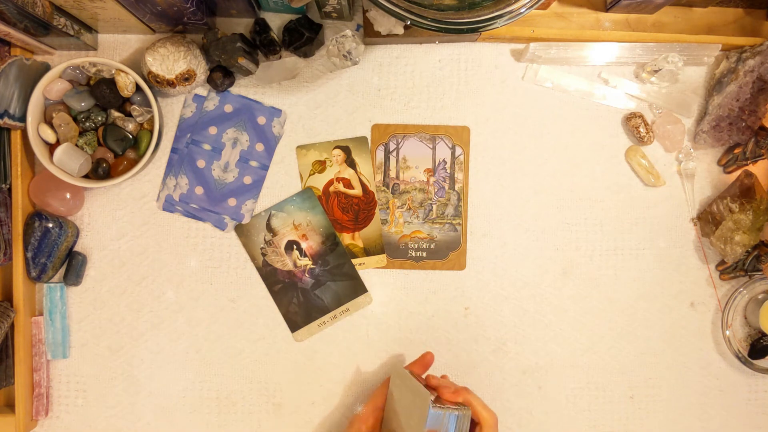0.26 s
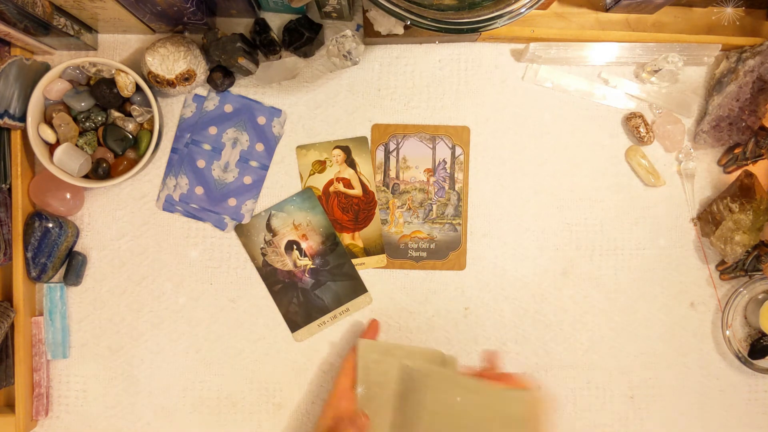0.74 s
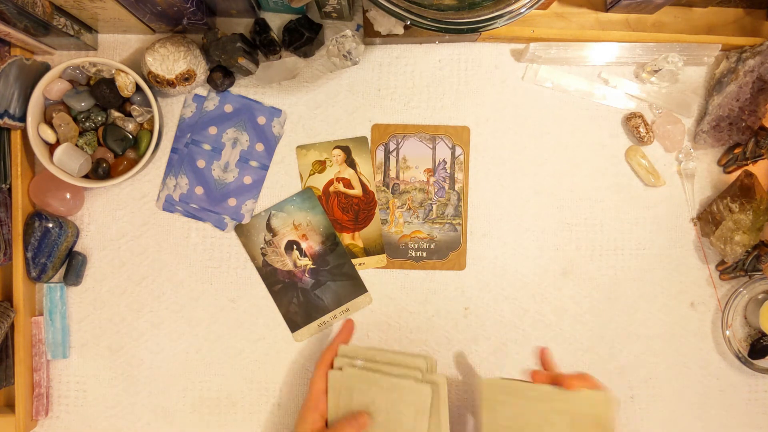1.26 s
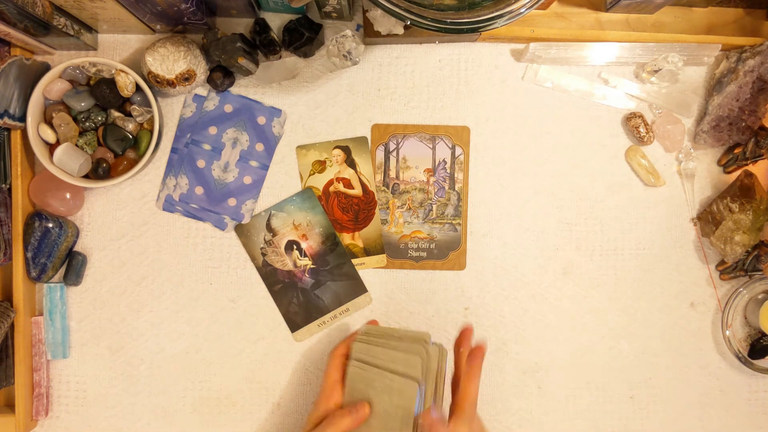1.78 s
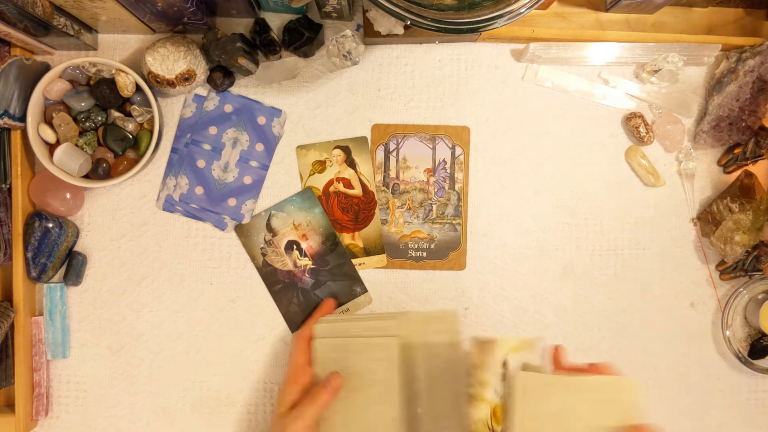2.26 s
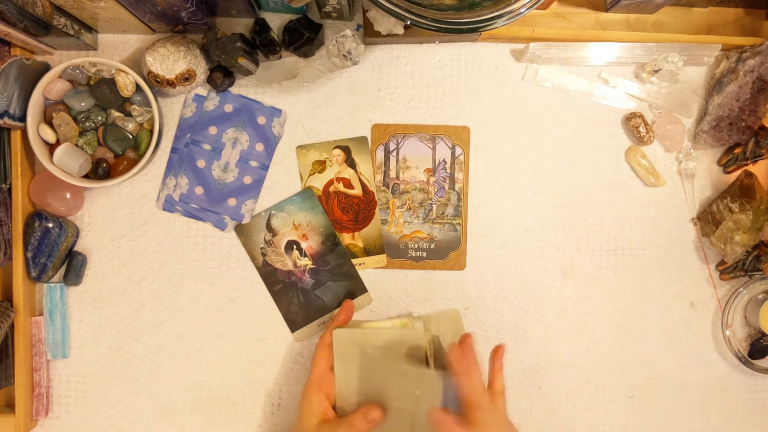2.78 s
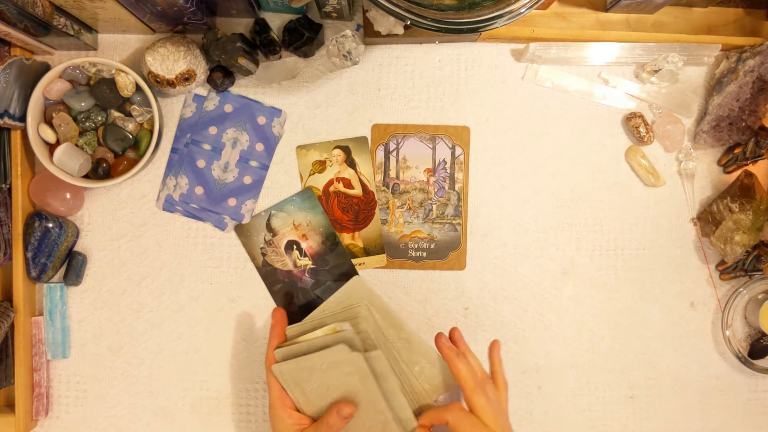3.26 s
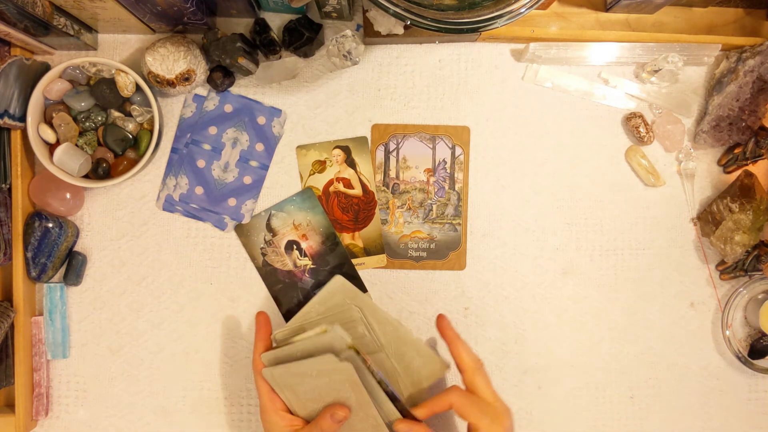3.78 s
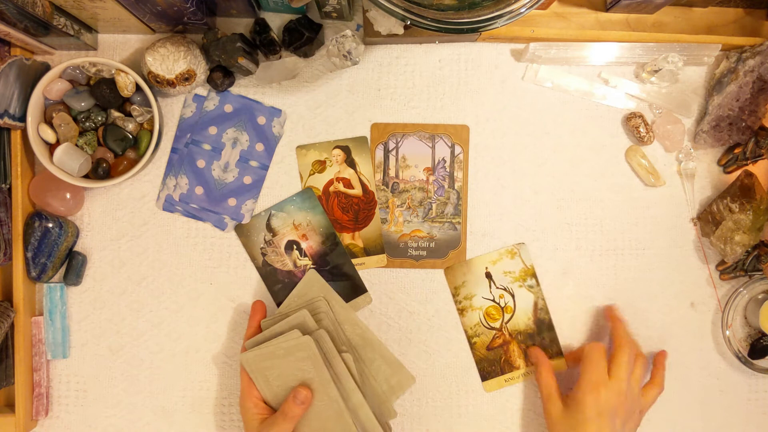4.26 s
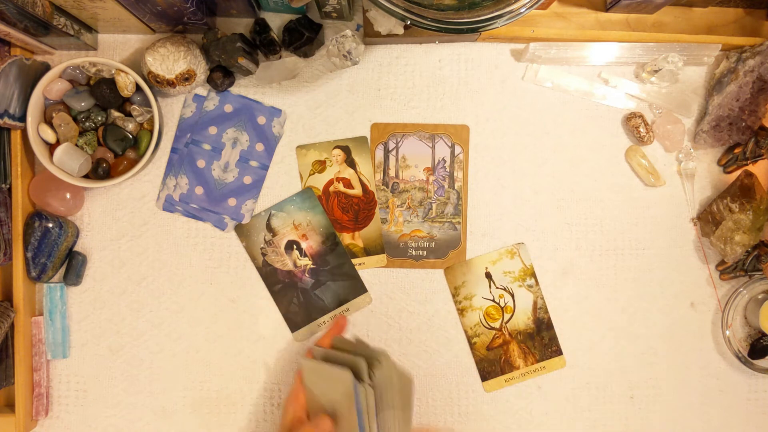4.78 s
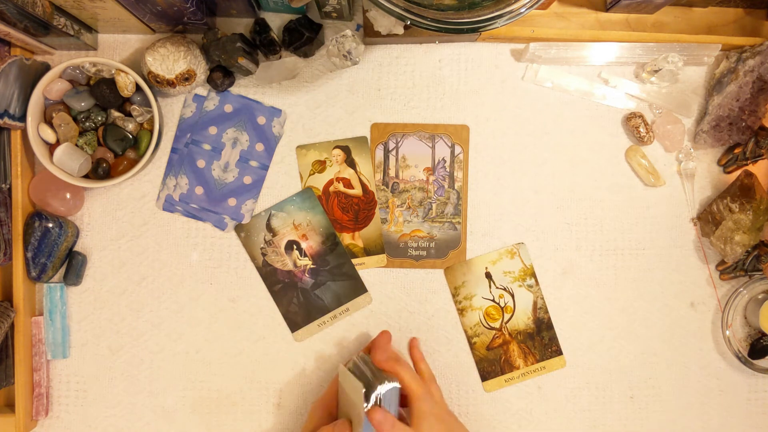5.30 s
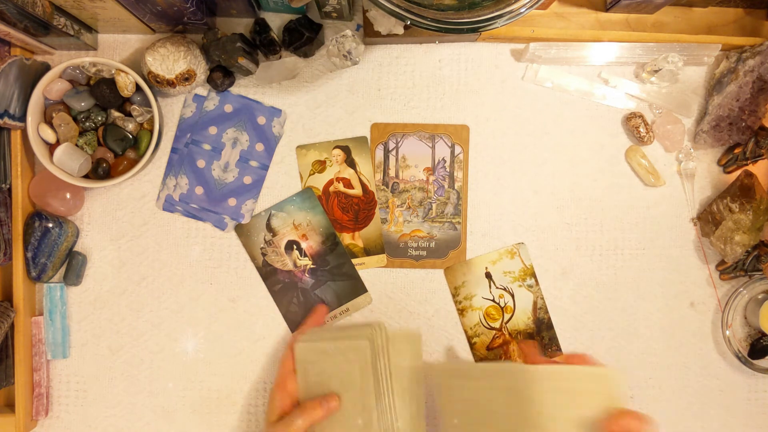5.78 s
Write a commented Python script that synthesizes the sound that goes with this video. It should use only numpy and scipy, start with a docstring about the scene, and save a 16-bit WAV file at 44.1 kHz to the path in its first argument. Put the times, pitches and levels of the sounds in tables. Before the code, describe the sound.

Stiff cards are shuffled overhand close to the microphone, with papery swishes, sharp edge snaps and hollow little pops over a low steady room rumble.

```python
"""A deck of stiff cards is shuffled overhand above a table in a quiet room, close to a microphone.
It starts almost quietly; from about 0.8 s packets slide past each other with a papery hiss (gritty noise),
their edges snap (short noise bursts) and trapped air pops (brief wavering tones), hardest near 2.6 and 3.0 s.
Faint shifts of the deck follow, more slides and pops from 4.1 to 4.5 s, and one last stroke near 6.0 s.
Between the louder strokes come faint rustles of the deck. A steady room rumble lies under it all."""
import sys
import numpy as np
from scipy import signal
from scipy.fft import rfft, irfft, next_fast_len
from scipy.io import wavfile
from scipy.ndimage import uniform_filter1d

SR = 44100
rng = np.random.default_rng(int(sys.argv[2]) if len(sys.argv) > 2 else 0)


def boost(x):
    """Linear amplitude factor 10**(x/20) for a level x in decibels (scalar or array-like)."""
    u = np.asarray(x, float) / 20
    return 10 ** u


def persist_wave(psi):
    """Save psi, clipped to +-1, as 16-bit WAV."""
    counts = np.round(np.clip(psi, -1, 1) * 32767).astype(np.int16)
    wavfile.write(sys.argv[1], SR, np.atleast_2d(counts).T)


N = 266302  # length in samples, about 6 s

# Spectrum of the room rumble and microphone hiss: (frequency [Hz], relative level [dB per Hz])
AIR_SPECTRUM = [(15, -16.5), (40, -11.5), (70, -12), (200, -9), (400, -10), (1300, -14), (1720, -18),
                (2100, -24), (3500, -31), (5500, -32), (8000, -34.5), (10000, -37), (13500, -35),
                (16500, -39)]
# Standing waves of the room lifting the rumble: (frequency [Hz], width [Hz], lift [dB])
STANDING_WAVES = [(76, 57, 12.5), (124, 34, 10), (167.6, 27, 14), (234, 53, 7.5), (302.5, 59, 8),
                  (385, 31, 7.5), (522.3, 30, -1.5), (570, 31, 5), (650, 19, 6), (804, 4.6, 10.5),
                  (834, 50, 4), (1010, 19, 4.5), (1067, 18, 5.5), (1580, 9.8, 4)]
# How fast the room's echoes die: (frequency [Hz], time to fall 60 dB [s])
WALL_DECAY = [(250, .12), (1000, .13), (4000, .16), (12000, .14)]
# Fingers faintly shifting the deck: (peak time [s], hiss level [dB], time to fall 20 dB [ms])
FINGER_SHIFTS = [(.007, -63.5, 17), (.212, -79, 47), (.325, -74.5, 118), (2.927, -71.5, 31.5),
                 (3.339, -70.5, 60), (3.52, -81, 48), (3.69, -72, 45), (3.897, -65.5, 84), (4.797, -81, 70),
                 (5.135, -64, 78), (5.21, -65, 67), (5.355, -72.5, 59.5), (5.416, -72.5, 11.5),
                 (5.507, -71, 40), (5.547, -69, 79), (5.66, -79, 119), (5.78, -75, 51.5),
                 (5.882, -64, 85.5)]
# Card faces rubbing, one row a stroke: (peak time [s], hiss level [dB], time to rise 20 dB [ms],
# time to fall 20 dB [ms], flexing of the card against the hiss [dB])
CARD_SLIDES = [(0.047, -65.5, 11, 10, -7), (.65, -65.5, 26, 100, -9), (.70, -63, 56, 109, -20),
               (.765, -60, 38, 32, -24), (0.784, -38, 8.5, 21, -26), (.805, -61, 15, 32, -7),
               (1.037, -40.5, 6.5, 95, -3.5), (1.079, -47.5, 31, 12, 2.5), (1.139, -34.5, 31, 39, -20),
               (1.375, -43.5, 9, 40, 6.5), (1.411, -43, 13, 23, -3.5), (1.457, -34, 32, 45, -13),
               (1.543, -46.5, 47, 4, -25), (1.567, -47, 2, 40, -11), (1.579, -37, 7, 15, -6),
               (1.599, -42, 2, 75, -6), (1.8, -52, 20.5, 27, -35), (1.887, -54.5, 62, 120, -45),
               (2.122, -54, 23, 4, -21), (2.299, -54.5, 61, 86, -40), (2.34, -54, 25, 127, -53),
               (2.448, -35, 23.5, 13, -39), (2.543, -53.5, 14, 5, -4), (2.572, -56, 9, 22, -6),
               (2.605, -57.5, -3.5, 41, 5.5), (2.635, -30, 0, 12, 4.5), (2.652, -39, 0, 46, 5),
               (2.738, -41.5, 68, 38, -8), (3.002, -67.5, 5, 63, 8.5), (3.027, -32.5, 1, 56.5, 3),
               (3.593, -63.5, 16.5, 88.5, -19), (4.04, -60.5, 8.5, 15.5, -28), (4.118, -59, 75, 38, -16),
               (4.16, -53.5, 82, 60, -15.5), (4.189, -46, 42, 72, -10), (4.239, -43.5, 46, 33, -6),
               (4.43, -70, 37, 26, -4.5), (4.468, -75, 17, 55, 10.5), (4.527, -56, 18.5, 38.5, 12.5),
               (4.883, -56.5, 10, 89, -24), (4.916, -51.5, 39.5, 69, -28.5), (5.095, -56.5, 46, 31.5, -33),
               (5.261, -63.5, 16.5, 81, -33), (5.937, -55, 33.5, 114.5, -42.5),
               (5.995, -55.5, 34.5, 15.5, -30), (6.024, -36, 26.5, 14, -24)]
# Level of the top treble against the hiss, as time goes by: (time [s], level [dB])
SHEEN_LEVEL = [(0, -27), (.3, -17), (.67, 3.5), (.79, -11), (1.05, -3), (1.6, -5), (1.8, -4), (1.88, -6.5),
               (2.12, -17), (2.3, -3.5), (2.45, -7), (2.6, -21), (2.74, -4.5), (3.03, -8), (3.6, -17),
               (4.1, -15.5), (4.2, -7), (4.9, -3.5), (5.1, -8), (5.26, -4.5), (5.5, -3), (6.0, -7.5)]
# Colour of card faces rubbing: (frequency [Hz], relative level [dB per Hz])
RUB_SPECTRUM = [(1710, -35), (2900, -13), (4030, -6.5), (4580, -5.5), (5140, -5), (5720, -9.5), (6600, -5),
                (8290, 3.5), (8840, -1.5), (9560, -9.5), (13700, -4.5), (15500, -20), (16000, -33)]
# Colour of a flexing card: (frequency [Hz], relative level [dB per Hz])
FLEX_SPECTRUM = [(280, -24), (480, -6.5), (964, -3.5), (1230, -8.5), (1520, 5), (1970, -4), (2440, 1.5),
                 (2670, -8), (2870, -5.5), (3000, -8), (3900, -28), (6600, -120)]
# Card edges striking: (time [s], level [dB], brightness [dB per octave])
EDGE_SNAPS = [(0.0492, -55, -5), (0.057, -56, -1), (0.2106, -61.5, -7), (1.0303, -38, -7.5),
              (1.035, -24.5, -3), (1.0407, -26, -0.5), (1.0764, -24.5, -3), (1.3751, -26.5, -4),
              (1.377, -23, -2), (1.412, -40, 3.7), (1.579, -24.5, 3), (1.5875, -29.5, 4.5),
              (1.6109, -27.5, 2.9), (1.6246, -27, 6), (2.1205, -35.5, -11), (2.3617, -50.5, 5),
              (2.461, -38, 2.5), (2.5338, -44.5, -2.3), (2.541, -33.5, -2.4), (2.551, -51, 0.5),
              (2.572, -39, 15), (2.6032, -41, 3.4), (2.6347, -16.5, -3), (2.6372, -22, -2.7),
              (2.6525, -17.5, 0), (2.6552, -25, -3.5), (2.6753, -27, 2), (2.925, -59, -2),
              (3.0258, -12, -5), (3.0303, -23.5, -0.7), (3.038, -26.5, 0), (3.0467, -27.5, -1.3),
              (3.0819, -35, 0.5), (3.5914, -52, 2.5), (4.2459, -32, -5), (4.5324, -36, -4.5),
              (4.7966, -58, -4.5), (5.4141, -63.5, 2), (5.7938, -60.5, 9), (6.0294, -35.5, -2.5)]
# Air squeezed from between cards or under a card:
# (peak time [s], level [dB], pitch [Hz], time to fall 60 dB [s])
AIR_POPS = [(.0476, -40, 6300, .0035), (.0481, -44.5, 570, .011), (1.0354, -28.5, 900, .0035),
            (1.0407, -23.5, 1540, .008), (1.072, -39.5, 1500, .0065), (1.3728, -29, 900, .0088),
            (1.3769, -19, 2290, .0087), (1.39, -40, 1500, .016), (1.4112, -42, 1000, .022),
            (1.5807, -29, 680, .011), (1.5995, -41.5, 650, .016), (1.6247, -40.5, 650, .046),
            (2.119, -42.5, 2000, .011), (2.1209, -40, 550, .013), (2.542, -50.5, 1800, .047),
            (2.549, -42.5, 445, .044), (2.572, -48.5, 1830, .05), (2.575, -53, 1196, .18),
            (2.613, -44, 1600, .013), (2.6343, -19.5, 650, .016), (2.6351, -15, 1450, .017),
            (2.636, -28, 250, .054), (2.6454, -23.5, 1450, .015), (2.6555, -22.5, 1400, .0099),
            (2.6555, -24, 620, .034), (2.665, -29, 1480, .07), (2.7, -45, 1480, .058),
            (2.734, -41.5, 1516, .033), (2.7497, -38.5, 480, .021), (3.0259, -10.5, 673.5, .0038),
            (3.0278, -9, 1116, .0023), (3.0316, -13.5, 985, .0049), (3.036, -26.5, 1500, .0098),
            (3.082, -10.5, 560, .0051), (3.094, -31.5, 592, .03), (4.2472, -38.5, 776, .045),
            (4.255, -46.5, 450, .086), (4.411, -36, 510, .026), (4.4129, -23.5, 810, .014),
            (4.427, -38.5, 830, .07), (4.432, -37.5, 1100, .039), (4.462, -49, 600, .04),
            (4.5304, -25.5, 630, .0094), (4.5315, -24.5, 1892, .0093), (6.01, -48, 170, .043)]
# Ringing of the deck and table top: (frequency [Hz], relative level [dB], time to fall 60 dB [s])
DECK_MODES = [(173, -12.5, 0.19), (250, -9, 0.035), (354, -4.5, 0.13), (435, -2.5, 0.037)]


def evened(x):
    """Scales a sound to an rms (average strength) of 1."""
    return x / np.sqrt(np.mean(x ** 2) + 1e-20)


def read(points, hz):
    """Joins table points on a log-frequency axis."""
    f, value = np.transpose(points)
    return np.interp(np.log(hz + 1), np.log(f + 1), value)


def add(mix, s, sound):
    """Mixes a sound in from time s, in seconds."""
    part = mix[max(round(s * SR), 0):][:len(sound)]
    part += sound[:len(part)]


def colour(x, gain):
    """Shapes a spectrum by gain(frequency in Hz)."""
    size = next_fast_len(len(x))
    hz = np.fft.rfftfreq(size, 1 / SR)
    return irfft(rfft(x, size) * gain(hz), size)[:len(x)]


def patchy(x, patchy_db, frames, bins):
    """Gives a sound level patches that drift over time and frequency."""
    z = signal.stft(x, nperseg=256, noverlap=192)[2]
    field = rng.standard_normal(z.shape[::-1]).T
    field = uniform_filter1d(field, bins, 0)  # wider bins: patches span more frequencies
    field = evened(uniform_filter1d(field, frames, 1))  # more frames: slower drift
    return signal.istft(z * boost(patchy_db * field), nperseg=256, noverlap=192)[1][:N]


def air():
    """The steady rumble of the room and the microphone's own hiss, as coloured noise."""
    level_db = -64.5
    still = patchy(rng.standard_normal(N), patchy_db=1.65, frames=40, bins=3)

    def gain(hz):
        lift_db = sum(db * np.exp(-(2 * (hz - f) / width) ** 2) for f, width, db in STANDING_WAVES)
        return boost(read(AIR_SPECTRUM, hz) + lift_db)

    return boost(level_db) * evened(colour(still, gain))


def room(x):
    """Sparse echoes of random sign, each frequency band dying at its own speed."""
    taps = np.zeros(SR // 2)
    at = np.arange(150, SR // 2 - 20, 20)  # one echo in every 20 samples
    taps[at + rng.integers(0, 20, len(at))] = rng.choice([-1., 1.], len(at))
    hz, t, z = signal.stft(taps, SR, nperseg=128)
    fade = boost(-60 * t / read(WALL_DECAY, hz)[:, None])
    tail = signal.istft(z * fade, SR, nperseg=128)[1]
    return signal.fftconvolve(x, tail / np.linalg.norm(tail))[:N]


def pops():
    """A pocket of air rings a few wavering cycles and thumps the deck and table."""
    rise_10ms_s, rise_power = .0011, .55  # rise of a pop that rings 10 ms; longer rings swell more slowly
    deck_db = -24.5
    thud_hz, thud_db, thud_t60_s = 70, -42.5, .15
    out, blows = np.zeros(N), np.zeros(N)
    waver = signal.fftconvolve(rng.standard_normal(N + SR), signal.windows.blackman(200), "same")
    waver = evened(waver)
    for s, db, hz, t60 in AIR_POPS:
        rise = rise_10ms_s * (t60 / .01) ** rise_power
        t = np.arange(-4 * rise, 1.4 * t60, 1 / SR)
        shape = boost(-60 * np.maximum(t, 0) / t60) * np.exp(-(np.minimum(t, 0) / rise) ** 2)
        for _ in range(2):  # no hard corner
            shape = uniform_filter1d(shape, size=round(rise * SR))
        # The pocket loses its shape, so the phase wanders away from the peak
        drift = 0.99 * waver[round(s * SR):][:len(t)] * np.minimum(abs(t) / 0.005, 1)
        add(out, s + t[0], boost(db) * shape * np.cos(2 * np.pi * hz * t + drift))
        push = signal.windows.hann(40) / 20 * 500 / hz  # a slow pop pushes harder
        add(blows, s, boost(db) * push)
    t = np.arange(SR // 8) / SR
    body = sum(boost(db - 60 * t / t60) * np.sin(2 * np.pi * hz * t) for hz, db, t60 in DECK_MODES)
    out += boost(deck_db) * signal.oaconvolve(blows, body)[:N]
    # Small things radiate no deep bass
    out = signal.sosfilt(signal.butter(3, 170, "high", fs=SR, output="sos"), out)
    # The table rocks on its legs after a hard pop
    thud = boost(thud_db - 60 * t / thud_t60_s) * np.sin(2 * np.pi * thud_hz * t)
    thud = thud * signal.windows.tukey(len(t), .3)
    return out + signal.oaconvolve(blows, thud)[:N]


def snaps():
    """One sharp crack with a burst of a millisecond or two behind it, in the colour of the card edge."""
    fade_s = 0.00092
    out, t = np.zeros(N), np.arange(-256, 768) / SR
    shape = np.exp(np.where(t < 0, 12.0 * t, -t) / fade_s)  # sharp start, slower end
    for s, db, tilt_db in EDGE_SNAPS:
        burst = rng.standard_normal(len(t))
        drive = shape * (burst + 5.6 * (t == 0))  # the crack is one strong sample at t = 0

        def gain(hz):
            bright_db = tilt_db * np.log2((hz + 1) / 7000)
            return boost(0.71 * read(RUB_SPECTRUM, hz) + bright_db) * (hz > 300)

        edge = evened(colour(drive, gain))
        add(out, s + t[0], boost(db) * edge * np.sqrt(np.mean(shape ** 2)))
    return out


def grit(slips_per_s, spread_db, smooth):
    """Tiny stick-slip clicks of the card coating over a smooth rub."""
    size = boost(spread_db * np.minimum(rng.exponential(1, N), 4))
    slips = rng.random(N) < slips_per_s / SR
    clicks = size * rng.choice([-1., 1.], N) * slips
    return evened(clicks) + smooth * rng.standard_normal(N)


def stroke_levels():
    """Every stroke swells, fades and settles; gives the levels of hiss, flexing, scrape and sheen."""
    shift_rise_share, shift_flex_db = .6, -31  # a shift's rise is a share of its fall
    scrape_db, scrape_per_flex = 0.57, 0.38  # a card that bends more is pressed harder and scrapes more
    # A light stroke loses scrape with each doubling of its fall over quick_ms
    slow_scrape_db, quick_ms = -0.5, 27
    # The cards creep on quietly after a stroke, and start lead_in rises early
    settle_db, settle_ms, lead_in = -21.5, 100, 3.2
    ms = np.arange(0, N + 16, 16) / SR * 1000  # one level every 16 samples
    power = np.zeros((4, len(ms)))
    shifts = [(s, db, shift_rise_share * fall, fall, shift_flex_db) for s, db, fall in FINGER_SHIFTS]
    for s, db, rise, fall, flex_db in CARD_SLIDES + shifts:
        late = ms - 1000 * s
        rise, fall = max(rise, 2), max(fall, 2)  # never quicker than 2 ms
        away = np.where(late < 0, -late / rise, late / fall)
        stroke = boost(-20 * away ** 1.177) ** 2
        away = np.where(late < 0, -late / (lead_in * rise), late / settle_ms)
        settle = boost(settle_db - 20 * away ** 1.5) ** 2
        slow_db = slow_scrape_db * np.log2(fall / quick_ms) * np.clip(-flex_db / 20, 0, 2)
        stroke_scrape_db = scrape_db + scrape_per_flex * flex_db + slow_db
        sheen_db = np.interp(s, *np.transpose(SHEEN_LEVEL))
        layers_db = np.array([0, flex_db, stroke_scrape_db, sheen_db])[:, None]
        power += boost(db + layers_db) ** 2 * (stroke + settle)
    return [np.interp(np.arange(N) / 16, np.arange(len(ms)), np.sqrt(p)) for p in power]


def slides():
    """Cards rub: one gritty noise feeds the flexing card, the scrape, the hiss and the sheen on top."""
    hiss, flex, scrape, sheen = stroke_levels()
    rub = patchy(grit(slips_per_s=6500, spread_db=3.7, smooth=1.1), patchy_db=3.5, frames=45, bins=2)
    rub = patchy(rub, patchy_db=1.6, frames=6, bins=50)  # the stroke stutters as single cards catch

    def above(hz, edge):
        return 1 / np.sqrt(1 + (edge / (hz + 1)) ** 30)

    def below(hz, edge):
        return np.sqrt(1 - above(hz, edge) ** 2)

    face = colour(rub, lambda hz: boost(read(RUB_SPECTRUM, hz)))
    out = scrape * evened(colour(face, lambda hz: below(hz, 6000)))
    out += hiss * evened(colour(face, lambda hz: above(hz, 6000) * below(hz, 10200)))
    out += sheen * evened(colour(face, lambda hz: above(hz, 10200)))
    return out + flex * evened(colour(rub, lambda hz: boost(read(FLEX_SPECTRUM, hz))))


def scene():
    """Cards near the microphone, their echoes and the room's floor."""
    floor = air()
    hits = pops() + snaps()
    rubs = slides()
    echoes = room(boost(-20.0) * rubs + boost(-9.5) * hits)
    return (rubs + hits + echoes + floor)[None]  # one channel


def top_cut(x):
    """Nothing passes above the cut-off."""
    return signal.sosfilt(signal.butter(12, 16880, fs=SR, output="sos"), x)


def record(dry):
    """Takes the finished mix to its final sound."""
    return top_cut(dry)


dry = scene()
out = record(dry)
persist_wave(out)
```